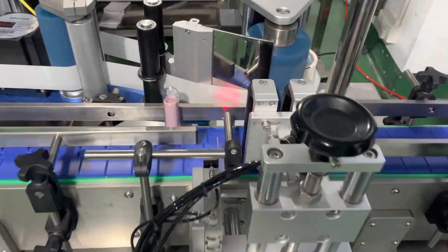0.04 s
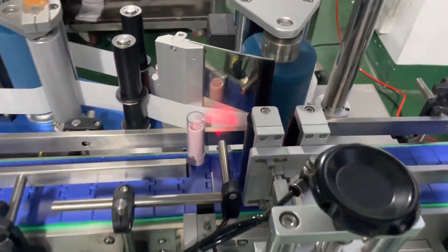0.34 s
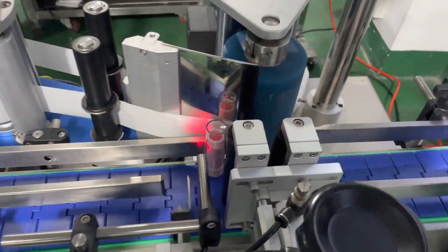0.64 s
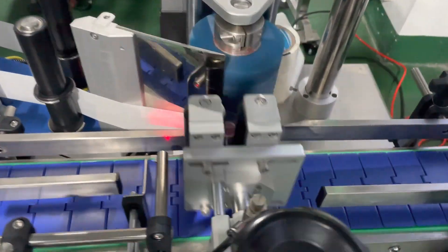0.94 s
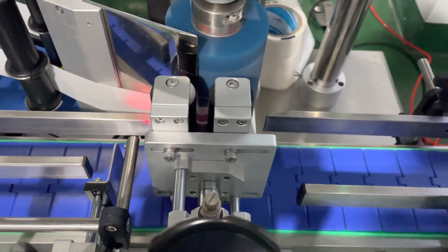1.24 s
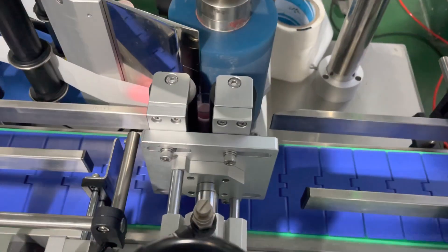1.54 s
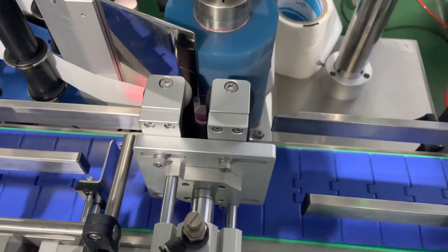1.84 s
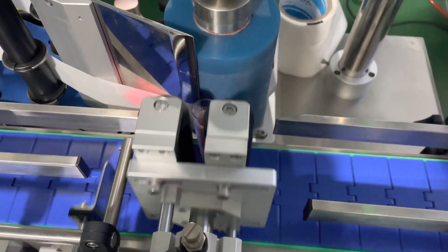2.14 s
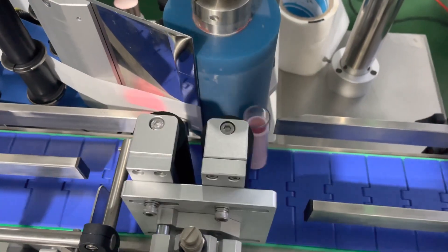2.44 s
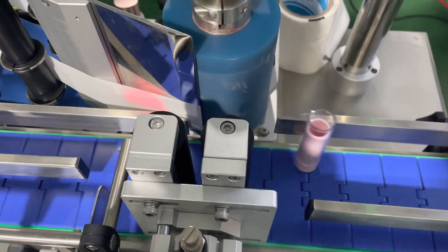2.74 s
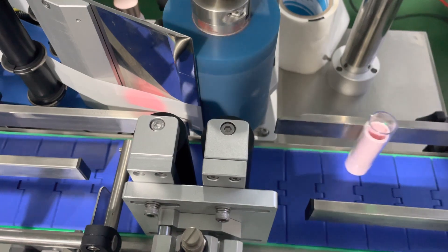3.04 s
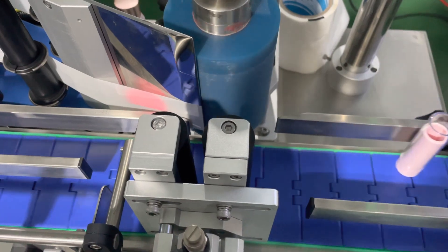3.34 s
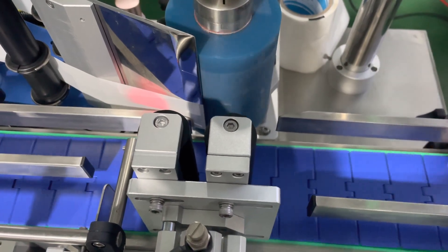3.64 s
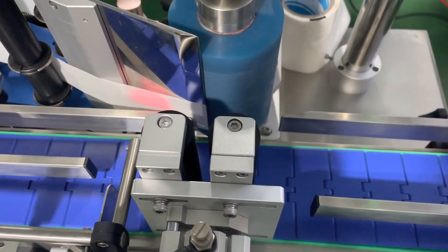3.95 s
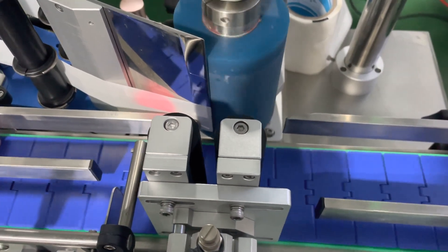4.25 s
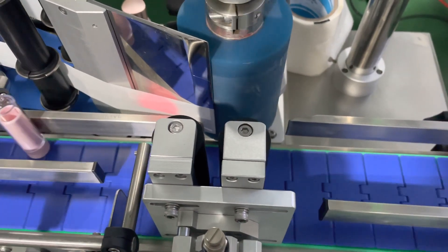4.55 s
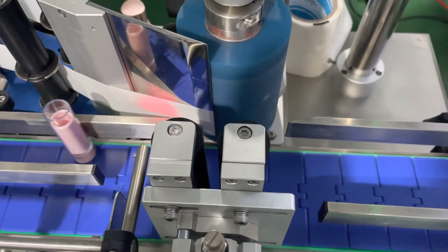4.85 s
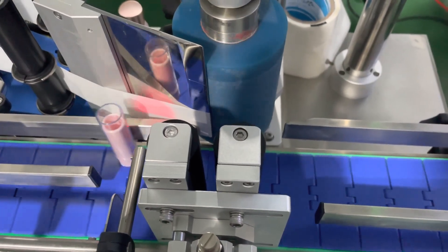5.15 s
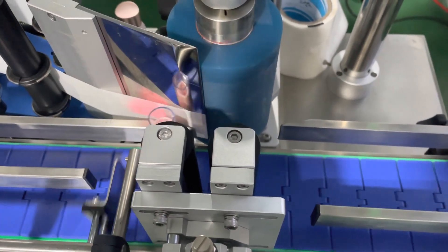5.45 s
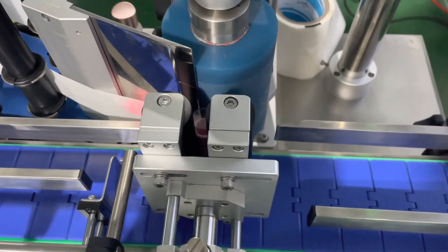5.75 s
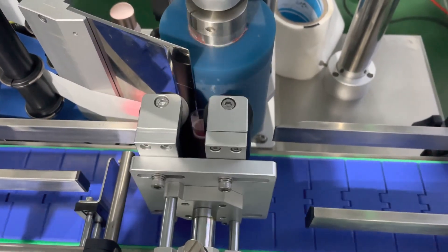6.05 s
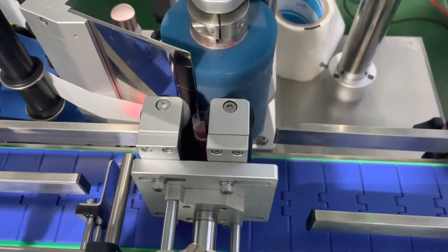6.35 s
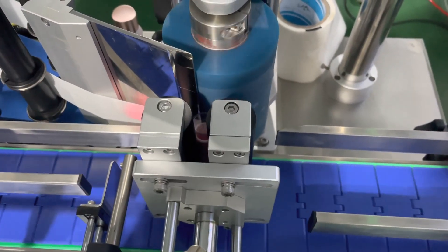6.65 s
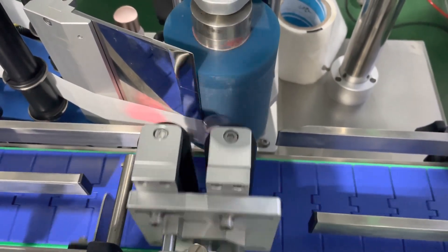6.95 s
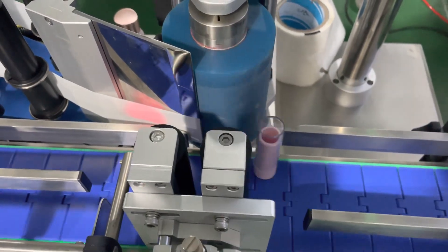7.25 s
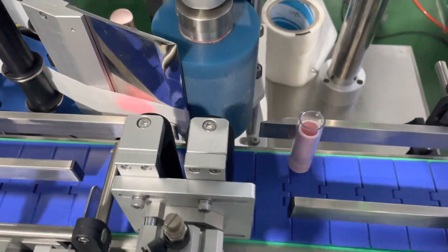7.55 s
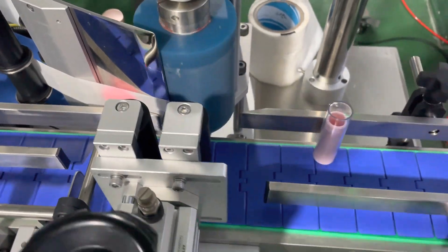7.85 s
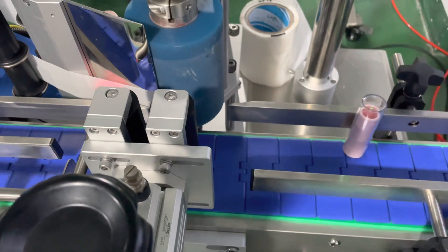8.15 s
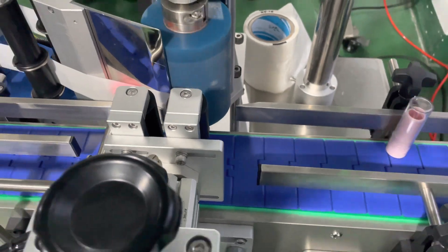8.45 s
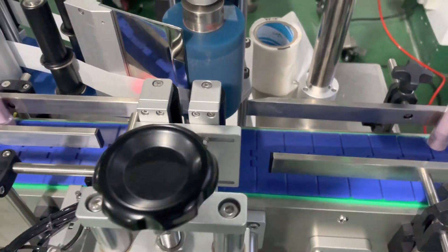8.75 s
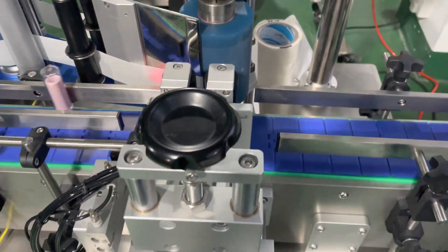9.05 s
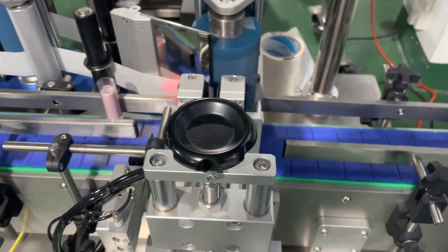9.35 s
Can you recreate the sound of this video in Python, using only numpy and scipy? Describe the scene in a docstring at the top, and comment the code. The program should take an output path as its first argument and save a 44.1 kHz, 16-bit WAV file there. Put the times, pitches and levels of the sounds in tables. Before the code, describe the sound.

A labeling machine runs close by in a factory hall, its motors humming and its conveyor belt rumbling throughout. Air hisses, a gate thuds and a metal clamp clacks shut on a tube. Label paper rustles faintly, then another hiss comes and the clamp knocks open. After about three seconds of running noise the cycle repeats, followed by a few light clicks of tubes against the guide rails.

```python
"""A wrap-around labelling machine works through two cycles in a factory hall, near a stereo microphone.
Valves vent air in turbulent jets, a stop gate thuds on its buffer, a clamp clacks shut on a tube,
the label web rustles past and the clamp knocks open; each impact sets the struck part ringing.
Tubes and guide rails click. Beneath it all, motors hum, their drive whistles and the conveyor belt
rumbles, while faint tones slide down far off in the hall."""
import sys
import numpy as np
from scipy import signal
from scipy.fft import rfft, irfft
from scipy.io import wavfile
from scipy.ndimage import uniform_filter1d

SR = 44100
rng = np.random.default_rng(int(sys.argv[2]) if len(sys.argv) > 2 else 0)


def digitize_waveform(pressure):
    """Quantize a signal to 16-bit integers and store it at the path in sys.argv[1].

    Rows of a 2-D input are taken as channels; values are limited to [-1, 1].
    """
    field = np.atleast_2d(pressure).T
    bounded = np.clip(field, -1, 1)
    quanta = np.round(bounded * 32767).astype(np.int16)
    wavfile.write(sys.argv[1], SR, quanta)


N = 414540
TIME = np.arange(N) / SR

# each tube starts the same timed cycle [start t/s, label feed duration/s]
CYCLES = [(0.649, 0.51), (5.418, 0.59)]
# the bare crack of metal on metal [f/Hz, spectral level/dB]
CRACK_SPECTRUM = [(300, -20), (1300, -8), (2000, -7), (2900, 2), (4400, -3), (5400, -3), (6200, -12),
                  (7200, -13), (11000, -22), (15800, -29)]
# the bright snap of a valve or a small contact [f/Hz, spectral level/dB]
SNAP_SPECTRUM = [(1500, 8.5), (3000, -5), (6000, -4), (9500, 3), (12000, 0), (15800, -8)]


def clamp():
    """Impact excitation: light metal clacks at once; the heavy frame takes a moment to ring and rattle."""
    # the jaws chatter shut on a tube [t/s, clack level/dB, knock level/dB]
    closings = [(.9985, -17.5, -38), (1.0028, -20.5, -37), (1.0143, -12.5, -27), (1.0163, -12.5, -23),
                (5.7672, -13, -38), (5.7713, -18.5, -34), (5.7762, -16, -31), (5.7830, -21, -24),
                (5.7846, -14.5, -21), (5.788, -20, -21.5)]
    # modes of the jaws [f/Hz, level/dB, T60/s]
    jaw_modes = [(1340, 2, 0.066), (1640, -9, 0.041), (1790, -5, 0.064), (2305, -3, 0.08),
                 (2520, 11, 0.051), (2920, 5, 0.042), (3140, 4, 0.041), (3400, 2, .025), (3570, 7, 0.025),
                 (3880, 8.5, .028), (4530, -6, 0.018), (5360, -2, .04), (5960, 1, 0.029), (7000, 0, 0.06)]
    # hollow clunk of the tube pressed on the roller [f/Hz, spectral level/dB]
    clunk = [(150, -20), (380, -2), (650, -9), (1000, 5), (1180, -6), (1550, 14), (2000, 4.5), (3200, -8),
             (6000, -24)]
    # the clamp opens against its end stop and rebounds [t/s, clack level/dB, knock level/dB]
    openings = [(2.2584, -18, -24), (2.2596, -18.5, -20.5), (2.2622, -27, -12.5), (2.2725, -26, -16.5),
                (7.0276, -14.5, -34), (7.0286, -15, -25), (7.0308, -25, -11.5), (7.0425, -37, -17)]
    # modes of the end stop [f/Hz, level/dB, T60/s]
    stop_modes = [(2100, -4, .05), (2460, 2, 0.02), (2800, 5, 0.02), (3030, 4, 0.022), (3700, 1, .016),
                  (4090, 4, 0.019), (4500, -8, .03), (5320, 1.5, 0.05), (7130, -7, 0.06)]
    # dull rattle of loose parts on the frame [f/Hz, spectral level/dB]
    rattle = [(120, -30), (300, 15.5), (520, 9.5), (690, -2), (1050, 3), (1350, -5.5), (2600, -7),
              (5000, -23)]
    # modes of the frame [f/Hz, level/dB, T60/s]
    frame_modes = [(300, -1, 0.13), (352, -1, 0.18), (405, 0, 0.19), (490, 2, .08), (535, 1, 0.06),
                   (1038, 9, .07)]

    def strike(blows, modes, body, crack_db, ring_db, frame_db, body_db, body_t60, rise_s=0.0014):
        out = np.zeros((2, N))
        for start, clack_db, knock_db in blows:
            crack = amp(crack_db) * burst(CRACK_SPECTRUM, t60=0.014)
            clack = amp(ring_db) * ring(modes, spread=0.33) + crack
            frame = amp(frame_db) * ring(frame_modes, spread=0.17)
            knock = frame + amp(body_db) * burst(body, t60=body_t60)
            add(out, start, amp(clack_db) * clack + amp(knock_db) * soften(knock, rise_s))
        return out

    closing = strike(closings, jaw_modes, clunk,
                     crack_db=5, ring_db=-1.5, frame_db=-1, body_db=3.5, body_t60=0.085)
    opening = strike(openings, stop_modes, rattle,
                     crack_db=4, ring_db=-1, frame_db=-2, body_db=-0.5, body_t60=0.17)
    return closing + opening


def stop_gate():
    """Cushioned impact: the gate lands on a soft buffer, each bounce ringing at its own pitch."""
    # landings and bounces [t/s, level/dB, frequency ratio, relative thud level/dB]
    bumps = [(.7425, -8.5, .98, -10), (.763, -16, 1.12, -12), (.778, -17, 1.18, -10), (5.514, -17, 1.1, 2),
             (5.5215, -15.5, .72, 2), (5.529, -17, .88, -3), (5.556, -22, 1.2, 3)]
    # modes of the gate at ratio 1 [f/Hz, level/dB, T60/s]
    gate_modes = [(326, 8, 0.11), (420, 11, 0.11), (480, 9, 0.1), (545, 3, 0.11), (850, -12, .06)]
    # thud of the buffer [f/Hz, spectral level/dB]
    buffer_spectrum = [(150, -20), (320, 6), (540, -14), (680, -3), (1000, -5), (1600, -17), (3000, -37)]
    out = np.zeros((2, N))
    for start, db, ratio, thud_db in bumps:
        modes = [(hz * ratio, level, t60) for hz, level, t60 in gate_modes]
        ringing = amp(1.5) * ring(modes, spread=0.59)
        thud = amp(thud_db - 0.5) * burst(buffer_spectrum, t60=0.084)
        add(out, start, amp(db) * soften(ringing + thud, rise_s=0.0035))
    return out


def air_exhaust(rise_s=0.0066, close_s=0.03):
    """Turbulent jet noise: a valve ticks, then its cylinder vents at falling pressure to the stroke's end."""
    # exhausts as the gate moves, the clamp closes and the clamp opens
    # [t/s in the cycle, duration/s, level/dB, decay/(dB/s), relative rush/dB, relative shrill/dB]
    vents = [(0, 0.12, -38, 53, 1, 3.5), (0.253, 0.12, -28.5, 43, -0.5, -7),
             (1.455, .16, -28, 77, 0.5, -3.5)]
    # fine jet at the silencer [f/Hz, spectral level/dB]
    jet_spectrum = [(2000, -23), (5000, -18), (6400, 10), (8000, 3.5), (9500, 8), (11000, 7.5), (12500, 3),
                    (14000, 2), (15800, 6)]
    # lower rush of the valve block [f/Hz, spectral level/dB]
    rush_spectrum = [(500, 13.5), (1500, 9), (2200, 5), (3100, 7.5), (4400, 5.5), (5400, 0.5), (7500, -12),
                     (12000, -13)]
    # narrow resonances of the exhaust port [f/Hz, spectral level/dB]
    shrill_spectrum = [(4000, -24), (5200, 1), (5450, -4), (5800, 0), (6500, -7), (7800, -36), (8400, 2),
                       (8900, -10)]
    jet, rush, shrill = noise(jet_spectrum), noise(rush_spectrum), noise(shrill_spectrum)
    out = np.zeros((2, N))
    for start, _ in CYCLES:
        for delay, length, db, decay, rush_db, shrill_db in vents:
            t = np.maximum(TIME - start - delay, 0)
            valve = (1 - np.exp(-t / rise_s)) * np.exp(-np.maximum(t - length, 0) / close_s)
            hiss = jet + amp(rush_db + 4) * rush + amp(shrill_db) * shrill
            out += amp(db - decay * t) * valve * hiss
            add(out, start + delay, amp(db + 4) * burst(SNAP_SPECTRUM, t60=0.0084))
    return out * amp(0.49 * drift(120))


def bench_shudder():
    """Forced vibration: the bench shakes while the clamp cylinder travels."""
    # cylinder strokes [t/s in the cycle, duration/s, level/dB]
    strokes = [(0.248, 0.084, -36), (1.45, 0.17, -19)]
    # response of the bench [f/Hz, spectral level/dB]
    response = [(40, -40), (70, -18), (88, 2), (105, -9.5), (180, -38), (1000, -90)]
    push = sum(amp(db) * np.sin(np.pi * np.clip((TIME - start - delay) / length, 0, 1))
               for start, _ in CYCLES for delay, length, db in strokes)
    return push * noise(response)


def label_web(delay_s=0.69, ramp_s=0.037, level_db=-43, crackle_db=1.5):
    """Friction noise: once the tube is held, the backing paper rustles over the peel plate."""
    # rustle of the paper [f/Hz, spectral level/dB]
    paper = [(800, -8), (2000, 13.5), (4000, 2), (7000, 4.5), (11000, -5), (15800, -34)]
    t = TIME - delay_s
    feed = sum(np.clip(np.minimum(t - start, start + length - t) / ramp_s, 0, 1)
               for start, length in CYCLES)
    return feed * noise(paper) * amp(level_db - crackle_db * drift(320))


def tube_clicks(tap_s=9.0505):
    """Brief contacts excite high modes: tubes and guide rails tick, ping and clink; one soft tap follows."""
    # contacts [t/s, tick level/dB, snap level/dB, ping level/dB, clink level/dB]
    contacts = [(3.7862, -27, -33, -27, -50), (3.792, -31, -40, -60, -50), (6.8408, -26, -54, -60, -45),
                (7.2738, -22, -24, -38, -33), (7.3695, -19.5, -14.5, -55, -38), (7.372, -22, -20, -55, -50)]
    # modes of a guide rail [f/Hz, level/dB, T60/s]
    rail_modes = [(2420, -4, .022), (3050, 0, .018), (3450, 1, .018), (3850, -2, .018), (4400, -9, .012),
                  (5400, -12, .035)]
    # modes of a glass tube [f/Hz, level/dB, T60/s]
    glass_modes = [(1600, -4, .1), (2934, 0, .2), (6300, -9, .035), (6850, -6, .035), (9211, -7, .07),
                   (9450, -6, .025)]
    # modes of a thin metal clink [f/Hz, level/dB, T60/s]
    clink_modes = [(3542, -5, .08), (4360, -6, .07), (5180, 0, .05)]
    # the papery tap [f/Hz, spectral level/dB]
    tap_spectrum = [(1800, -22), (2800, -7), (3500, 5), (4100, -4), (5200, -16), (8000, -32)]
    out = np.zeros((2, N))
    for start, tick_db, snap_db, ping_db, clink_db in contacts:
        tick = amp(-1) * ring(rail_modes, spread=0.3) + amp(-5) * burst(CRACK_SPECTRUM, t60=0.014)
        snap = amp(snap_db + 3) * burst(SNAP_SPECTRUM, t60=0.013)
        ping = amp(ping_db) * ring(glass_modes, spread=0.06)
        clink = amp(clink_db) * ring(clink_modes, spread=0.11)
        add(out, start, amp(tick_db) * tick + snap + ping + clink)
    add(out, tap_s, amp(-26.5) * burst(tap_spectrum, t60=0.056))
    return out


def motors(hum_hz=70.72, drone_hz=153.4, gear_hz=512.6, beat_period_s=1.212, beat_peak_s=1.364):
    """Periodic forces give line spectra: motors hum, gears whine, bearings sing and the drive whistles."""
    # uneven throb of the hum [t/s, level/dB]
    throb = [(0, -44), (.13, -42), (.3, -21), (.65, -19), (1, -26.5), (1.1, -39), (1.38, -20.5), (1.7, -19),
             (2.05, -28), (2.25, -28), (2.42, -18), (2.65, -22), (2.8, -31), (3.1, -25), (3.3, -26),
             (3.5, -17.5), (3.75, -16), (4, -27), (4.15, -35), (4.3, -20.5), (4.75, -24.5), (5, -28),
             (5.3, -37), (5.45, -18.5), (5.75, -18.5), (6.25, -28), (6.45, -24), (6.95, -21), (7.25, -38),
             (7.5, -18), (8.15, -21.5), (8.45, -24), (8.8, -17), (9.1, -18), (9.25, -38)]
    # a higher drone swells and sinks [t/s, level/dB]
    drone_level = [(0, -34), (.5, -25), (.9, -25), (1.2, -45), (1.7, -22.5), (2, -38), (2.3, -25.5),
                   (2.75, -28.5), (3, -48), (3.6, -33), (4, -25.5), (4.45, -25), (4.7, -33), (5.15, -27),
                   (5.6, -30), (5.95, -25.5), (6.55, -41.5), (6.75, -24), (7.05, -20.5), (7.3, -39),
                   (7.6, -25), (8, -31), (8.2, -26.5), (8.9, -27.5), (9.4, -31)]
    # gear whine, loudest in front of the machine [t/s, level/dB]
    whine_level = [(0, -28), (.65, -26), (.97, -28.5), (1.1, -36.5), (3, -42), (6.5, -48), (7.6, -41),
                   (8, -35), (8.5, -36.5), (9.4, -32)]
    # steady motor tones [f/Hz, level/dB]
    motor_lines = [(49.5, -42), (94, -35.5), (105.5, -34.5), (156.5, -40), (209.4, -46), (245, -45),
                   (286, -43.5), (342, -42), (440, -44.5), (535.5, -46)]
    # faint singing of the bearings [f/Hz, level/dB]
    bearing_lines = [(2929, -60), (5770, -70)]
    # switching tone of the drive and its sidebands [f/Hz, level/dB]
    drive_lines = [(9686, -74), (9736, -64), (9950.6, -61), (9999.7, -64), (10050.5, -62), (10144.5, -67),
                   (10264.4, -57), (10314.7, -68)]
    # the whistle grows as the microphone nears the drive [t/s, gain/dB]
    nearness = [(0, -1.5), (3, 0), (7.5, 0.8), (9.4, -2)]
    hum = amp(curve(throb) - 3) * tone(hum_hz, waver_db=1.2, rate_hz=7.3, phase_rad=0.17)
    beat = 1 + 0.65 * np.cos(2 * np.pi * (TIME - beat_peak_s) / beat_period_s)
    octave = amp(-32.5) * beat * tone(2 * hum_hz, waver_db=0.5, rate_hz=6.1, phase_rad=0.21)
    drone = amp(curve(drone_level)) * tone(drone_hz, waver_db=2, rate_hz=6.5, phase_rad=0.95)
    whine = amp(curve(whine_level) - 3) * tone(gear_hz, waver_db=2, rate_hz=15, phase_rad=0.3)
    steady = sum(amp(db) * tone(hz, waver_db=2.5, rate_hz=3.5, phase_rad=0.76) for hz, db in motor_lines)
    bearings = sum(amp(db) * tone(hz, waver_db=2, rate_hz=14, phase_rad=1.6) for hz, db in bearing_lines)
    whistle = sum(amp(db) * tone(hz, waver_db=1.2, rate_hz=2.5, phase_rad=1.3) for hz, db in drive_lines)
    return hum + octave + drone + whine + steady + bearings + whistle * amp(curve(nearness))


def conveyor():
    """Random vibration gives broadband noise: the belt rumbles, its sliding slats add a fluttering wash."""
    # belt, fans and hall [f/Hz, spectral level/dB]
    rumble_spectrum = [(15, -29), (30, -15), (50, -0.5), (64, 6), (82, -3), (104, 3.5), (126, -2.5),
                       (158, 4), (205, 2), (262, -5), (300, -1.5), (500, -7.5), (900, -9), (1400, -56.5)]
    # sliding slats [f/Hz, spectral level/dB]
    wash_spectrum = [(400, -20), (800, -2), (1080, 4), (1300, 0.5), (1550, 0), (2000, -6), (2900, -8),
                     (3800, -15.5), (5000, -19), (7000, -23.5), (8200, -25.5), (10300, -26.5),
                     (12000, -30.5), (13500, -35), (15100, -32), (15800, -37)]
    # the level dips or swells briefly [t/s, half width/s, change/dB]
    swells = [(1.13, 0.076, -3.5), (7.45, 0.18, 1.2)]
    swell_db = sum(db * np.exp(-((TIME - centre) / width) ** 2) for centre, width, db in swells)
    running_db = swell_db + 0.52 * drift(2.6)
    rumble = noise(rumble_spectrum) * amp(-21.5 + running_db + 0.5 * drift(13))
    wash = noise(wash_spectrum) * amp(-30.5 + running_db + 0.5 * drift(33))
    return rumble + wash


def distant_glides(blur=0.55, blur_hz=16, rise_s=0.034, release_s=0.05, fade_db=3):
    """Random modulation broadens a line: sinking, fading tones are blurred a little by the distance."""
    # far-off tones [t/s, duration/s, initial f/Hz, fall/(octaves/s), level/dB]
    glides = [(6.36, .15, 740, .75, -25), (6.52, .19, 605, .85, -29), (7.23, .2, 880, .2, -29.5),
              (7.36, .28, 745, .9, -33), (7.39, .2, 1120, .2, -33), (7.65, .18, 598, 1.05, -27.5)]
    out = np.zeros((2, N))
    for start, length, hz, fall, db in glides:
        t = np.clip(TIME - start, 0, length)
        phase = 2 * np.pi * np.cumsum(hz * 2 ** (-fall * t)) / SR
        ramps = np.clip(np.minimum(t / rise_s, (length - t) / release_s), 0, 1)
        envelope = amp(db - fade_db * t / length) * ramps
        for channel in out:
            in_phase = np.sqrt(1 - blur ** 2) + blur * drift(blur_hz)
            quadrature = blur * drift(blur_hz)
            channel += envelope * (in_phase * np.cos(phase) + quadrature * np.sin(phase))
    return out


def hall(x, gap_s=0.00087):
    """Reverberation: each channel has a diffuse, exponentially decaying tail, the treble dying first."""
    # reverberation time [f/Hz, T60/s]
    decay_times = [(200, 0.75), (1500, 0.36), (5000, 0.43), (14000, 0.077)]
    hz, t, bands = signal.stft(rng.standard_normal((2, SR)), SR, nperseg=256)
    decay = amp(-60 * t / at_frequency(decay_times, hz)[:, None])
    _, tail = signal.istft(bands * decay, SR, nperseg=256)
    tail *= np.clip(TIME[:tail.shape[1]] / gap_s - 1, 0, 1)
    return signal.fftconvolve(x, tail / np.linalg.norm(tail[0]), axes=1)[:, :N]


def ring(modes, spread, size=16384):
    """Free decay of modes, slightly detuned at each blow; spread scatters their phase between channels."""
    t = TIME[:size]
    sides = np.array([[1], [-1]])
    out = np.zeros((2, size))
    for hz, db, t60 in modes:
        detune, offset, half_turns = rng.standard_normal(3)
        phase = 2 * np.pi * hz * (1 + 0.013 * detune) * t + np.pi * half_turns
        out += amp(db - 60 * t / t60) * np.sin(phase + spread * offset * sides)
    return out / np.sqrt(sum(amp(db) ** 2 for _, db, _ in modes) / 2)


def burst(spectrum, t60, size=16384):
    """Modal overlap: countless modes dying together merge into decaying noise."""
    return noise(spectrum, size) * amp(-60 * TIME[:size] / t60)


def noise(spectrum, size=N):
    """Partial coherence: coloured stereo noise of rms 1, partly alike at the two microphone ports."""
    # likeness of left and right [f/Hz, correlation]
    coherence = [(60, .98), (160, .95), (330, .78), (600, .35), (1050, .25), (1550, .15), (2700, .65),
                 (5000, .68), (7500, .88), (11000, .92), (14000, .98)]
    hz = np.fft.rfftfreq(size, 1 / SR)
    mid, side = rfft(rng.standard_normal((2, size)))
    alike = at_frequency(coherence, hz)
    mid, side = mid * np.sqrt(1 + alike), side * np.sqrt(1 - alike)
    return unit(irfft(np.array([mid + side, mid - side]) * amp(at_frequency(spectrum, hz)), size))


def tone(hz, waver_db, rate_hz, phase_rad):
    """Random amplitude and phase modulation of a sinusoid, at rms 1."""
    envelope = amp(waver_db * drift(rate_hz))
    return unit(envelope * np.sin(2 * np.pi * hz * TIME + phase_rad * drift(rate_hz)))


def drift(rate_hz):
    """Low-passed noise: a slow wander of rms 1."""
    hz = np.fft.rfftfreq(N, 1 / SR)
    return unit(irfft(rfft(rng.standard_normal(N)) * np.exp(-(hz / rate_hz) ** 2), N))


def soften(sound, rise_s):
    """Exponential build-up of the onset."""
    return sound * (1 - np.exp(-TIME[:sound.shape[1]] / rise_s))


def amp(db):
    """Decibels to amplitude ratio."""
    return 10 ** (np.asarray(db) / 20)


def unit(x):
    """Normalisation to rms 1."""
    return x / np.sqrt(np.mean(x ** 2) + 1e-20)


def at_frequency(points, hz):
    """Interpolation on a log-frequency axis."""
    f, value = np.transpose(points)
    return np.interp(np.log(hz + 1), np.log(f + 1), value)


def curve(points):
    """Interpolation of [t/s, value] at every sample."""
    return np.interp(TIME, *np.transpose(points))


def add(mix, start_s, sound):
    """Superposition of a stereo sound from start_s on."""
    part = mix[:, round(start_s * SR):][:, :sound.shape[1]]
    part += sound[:, :part.shape[1]]


def scene():
    """Superposition: the working cycle and its reverberation over the running noise."""
    leftward = amp([[1], [-1]])
    cycle = air_exhaust() + label_web()
    cycle += leftward * (clamp() + stop_gate() + bench_shudder() + tube_clicks())
    return cycle + conveyor() + motors() + distant_glides() + amp(-12.5) * hall(cycle)


def record(dry, threshold_db=-15, slope=0.11, recovery_db_per_s=12, ceiling=0.85, cutoff_hz=15900):
    """Transduction: port balance and phase, gentle compression, rounded peaks, then a band limit."""
    # the two microphone ports part in phase in the treble [f/Hz, phase difference/rad]
    port_phase = [(20, 0), (4800, 0), (6000, 1.3), (7600, 3.14), (8300, 3.6), (10600, 6.1), (12000, 6.7),
                  (12900, 7.9), (13900, 9.3), (16000, 9.6)]
    # leftward lean [f/Hz, gain/dB]
    balance = [(150, -0.54), (350, -0.29), (700, 0.31), (5000, 0.14), (9000, -0.048)]
    hz = np.fft.rfftfreq(N, 1 / SR)
    left, right = rfft(dry)
    lean = amp(at_frequency(balance, hz))
    phase_shift = np.exp(1j * np.interp(hz, *np.transpose(port_phase)))
    x = irfft(np.array([left * lean, right / lean * phase_shift]), N)
    power_db = 10 * np.log10(abs(uniform_filter1d((x ** 2).mean(0), size=900)) + 1e-12)
    recovery = recovery_db_per_s * TIME
    held_db = np.maximum.accumulate(power_db + recovery) - recovery
    excess_db = np.maximum(held_db - threshold_db, 0)
    x = x * amp(-slope * uniform_filter1d(excess_db, size=300))
    x = x / (1 + (x / ceiling) ** 8) ** (1 / 8)
    lowpass = signal.firwin(511, cutoff_hz, window=("kaiser", 9), fs=SR)
    return signal.oaconvolve(x, lowpass[None], "same")


dry = scene()
out = record(dry)
digitize_waveform(out)
```